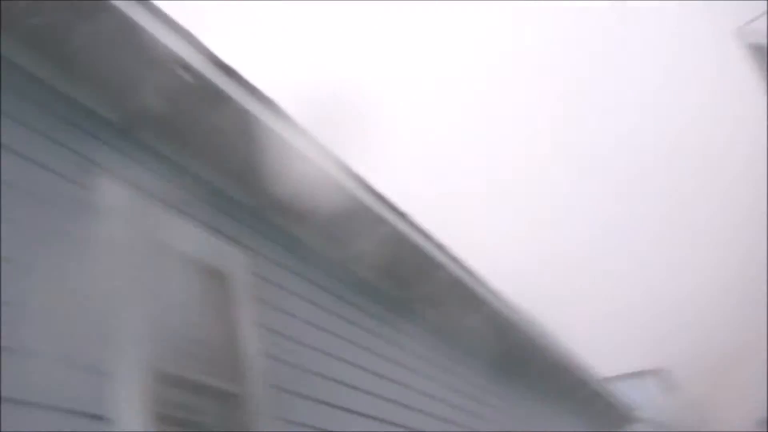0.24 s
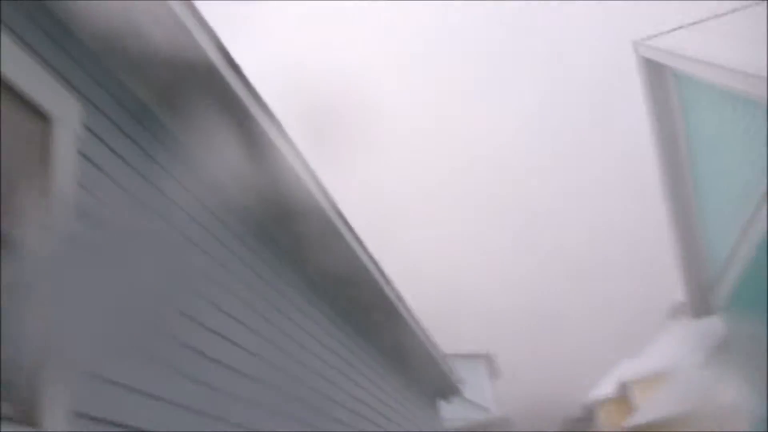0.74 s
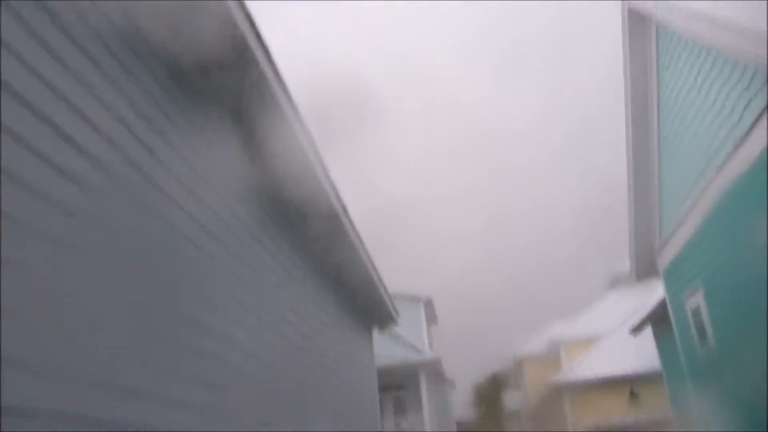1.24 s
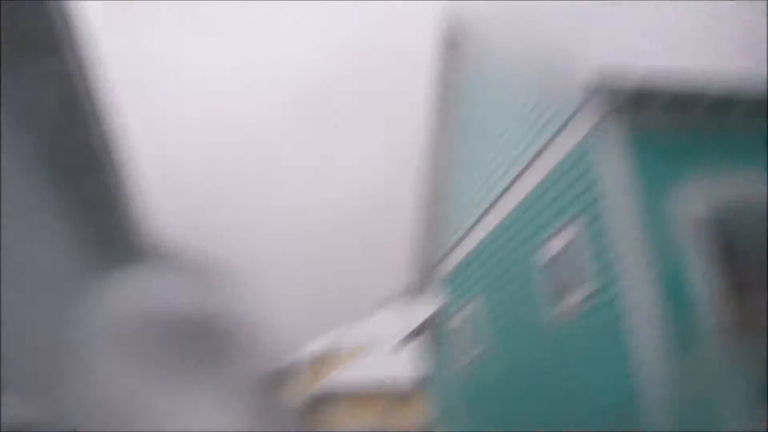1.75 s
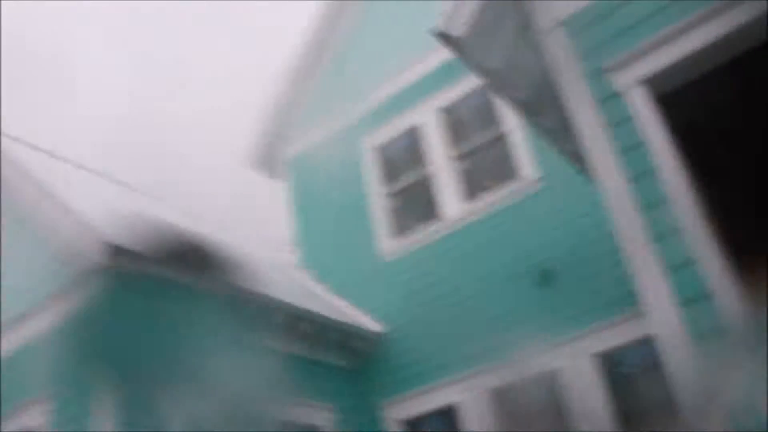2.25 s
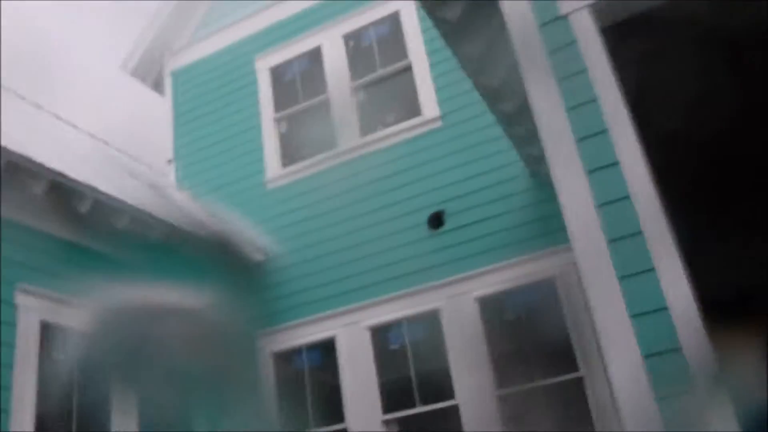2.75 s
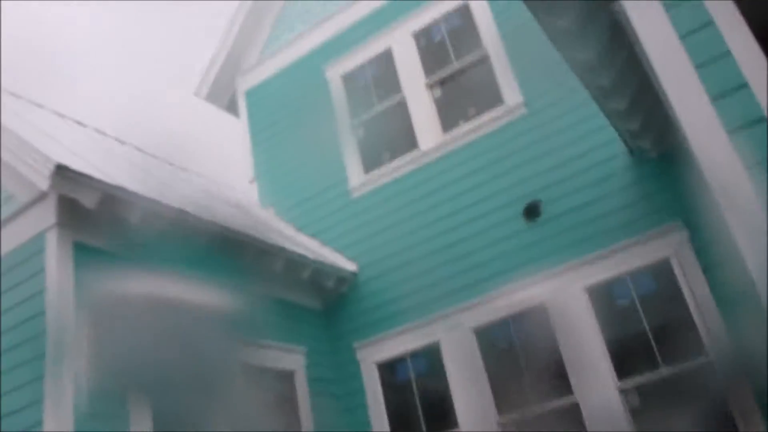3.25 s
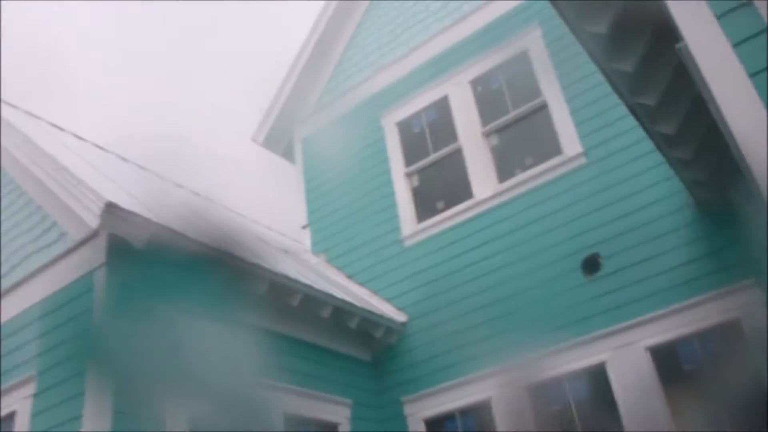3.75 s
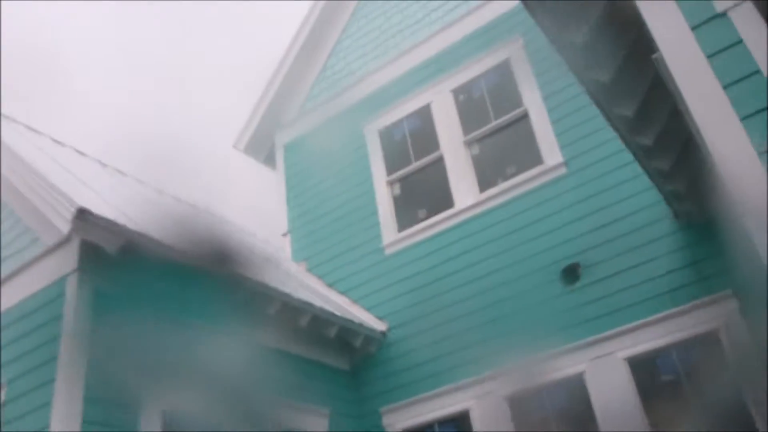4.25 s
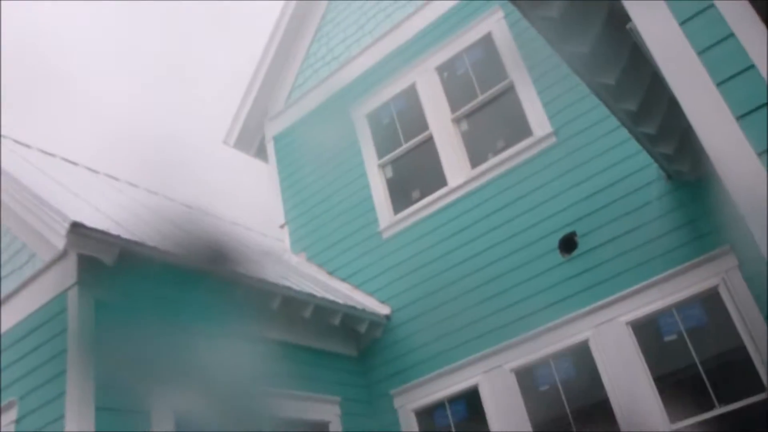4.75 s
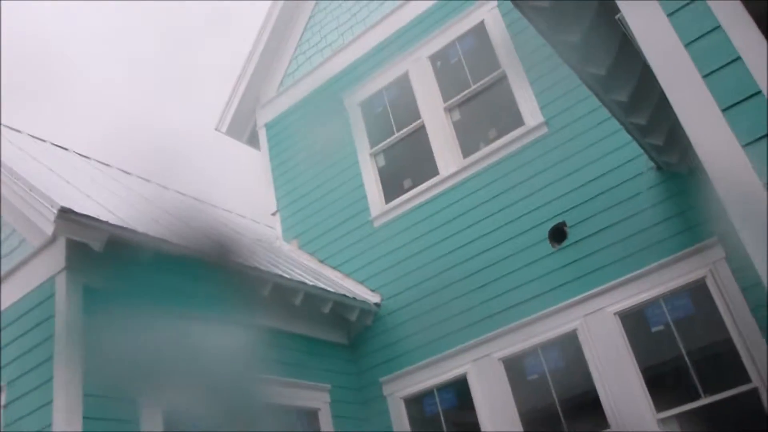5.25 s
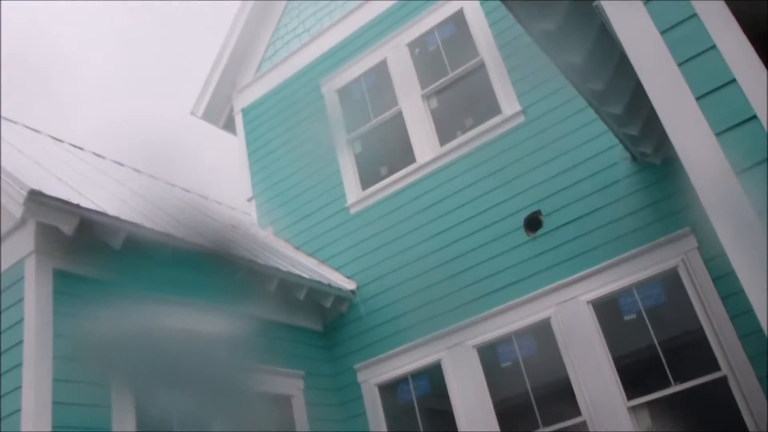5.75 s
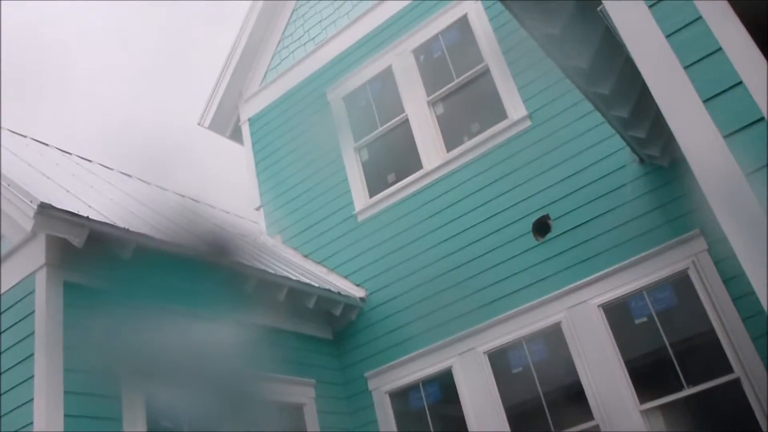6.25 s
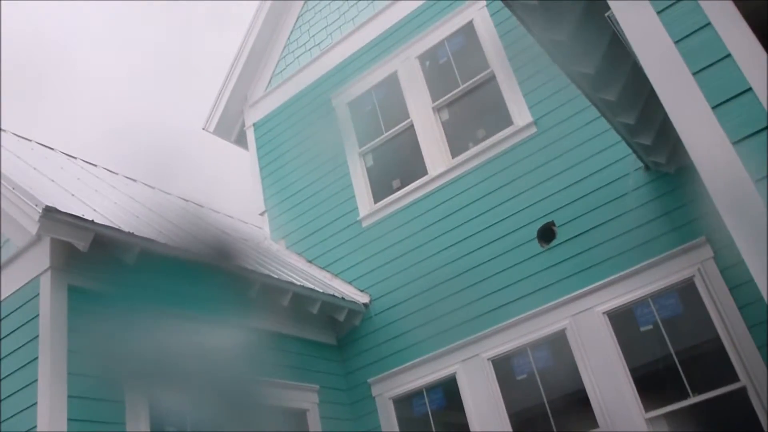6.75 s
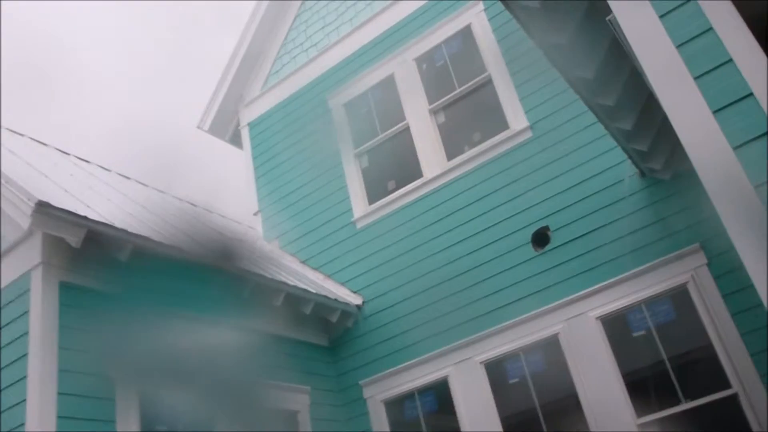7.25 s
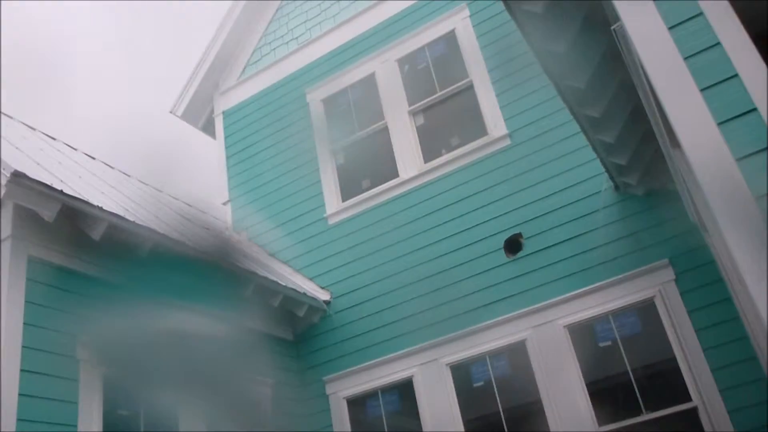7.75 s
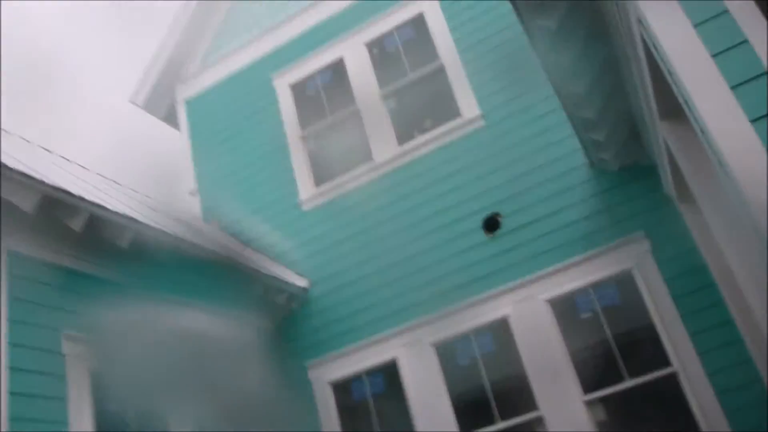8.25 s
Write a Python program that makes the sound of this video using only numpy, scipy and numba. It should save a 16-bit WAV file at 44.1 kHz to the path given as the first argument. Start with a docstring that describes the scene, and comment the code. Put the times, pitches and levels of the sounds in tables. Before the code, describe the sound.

A steady downpour outdoors, close and harsh, with bright pinging droplets, occasional low thuds on the casing and a few soft handling rubs.

```python
"""Heavy rain between wooden houses, heard through a small camera that stands out in it.
The downpour (coloured noise under flurries of tiny rings) swells within the first second, then comes in surges.
From the start drops ring the microphone port near 3.7 kHz, and soon fat ones thump the casing as damped pulses.
Soft low rubs of the hand, swelling bands of noise, come from about two seconds on and once more near the end.
Throughout, the hardest hits overload the input, and the gain control ducks the rain and lets it swell back."""
import sys
import numpy as np
from scipy import signal
from scipy.fft import rfft, irfft, next_fast_len
from scipy.io import wavfile
from scipy.ndimage import map_coordinates
from numba import njit

SR = 44100
rng = np.random.default_rng(int(sys.argv[2]) if len(sys.argv) > 2 else 0)


def generate_wav(signal):
    """Clip the signal to [-1, 1] and save it as 16-bit WAV at the path in sys.argv[1]."""
    frames = np.transpose(np.atleast_2d(signal))
    scaled = np.clip(frames, -1, 1) * 32767
    pcm = np.round(scaled).astype(np.int16)
    wavfile.write(sys.argv[1], SR, pcm)


N = 374409
USUAL_RAIN_DB = -29  # spray level of usual rain, the reference for wash, drop sizes and pitch


def amp(db):
    """The decibel law: level in dB to amplitude ratio."""
    return 10 ** (np.asarray(db) / 20)


def unit(x):
    """Normalisation by mean power: scale to rms 1."""
    return x / np.sqrt(np.mean(x ** 2) + 1e-20)


def curves(rows):
    """Linear interpolation: one value per sample for each column after the time."""
    s, *columns = np.transpose(rows)
    t = np.arange(N) / SR
    return [np.interp(t, s, column) for column in columns]


def wobble(rate):
    """Band-limited fluctuation: a smooth curve through random knots, rate knots a second."""
    knots = rng.standard_normal(int(N * rate / SR) + 4)
    return map_coordinates(knots, [np.arange(N) * rate / SR])


def filtered(x, response):
    """Linear filtering: the spectrum of x times a complex response of frequency."""
    m = next_fast_len(N + SR // 2)
    hz = np.fft.rfftfreq(m, 1 / SR)
    return irfft(rfft(x, m) * response(hz), m)[:N]


def noise(spectrum):
    """Spectral shaping: white noise takes a (Hz, dB) colour and is set to rms 1."""
    f, db = np.transpose(spectrum)
    colour = lambda hz: amp(np.interp(np.log(hz + 1), np.log(f), db))
    return unit(filtered(rng.standard_normal(N), colour))


def placed(times, sounds):
    """Superposition: sum one short sound per row, each starting at its time in seconds."""
    start = np.round(np.maximum(times, 0) * SR).astype(int)
    index = start[:, None] + np.arange(sounds.shape[1])
    return np.bincount(index.ravel(), sounds.ravel(), N)[:N]


def port_hz(level_db):
    """Mass loading: more spray thickens the water film on the port and lowers its pitch."""
    usual_hz, sag_hz_per_db = 3837, 20
    return usual_hz - sag_hz_per_db * (level_db - USUAL_RAIN_DB)


def port_rings(hz, splash_db, rise, decay, splash_decay, splash_top_hz, size=220):
    """Damped resonance: per drop, a few cycles of the port's air, peak 1, under a brief splash (times in s)."""
    t = np.arange(size) / SR
    life = decay * np.exp(0.28 * rng.standard_normal((len(hz), 1)))
    envelope = (1 - np.exp(-t / rise)) * np.exp(-t / life)
    ring = np.sin(2 * np.pi * hz[:, None] * t) * envelope
    burst = rng.standard_normal(ring.shape) * np.exp(-t / splash_decay)
    band = signal.butter(2, [1400, splash_top_hz], "band", fs=SR, output="sos")
    hiss = signal.sosfilt(band, burst)
    # each splash also has a short note of its own, from the spot it lands on
    spot_hz = 1300 * 5.4 ** rng.random((len(hz), 1))
    spot = np.sin(2 * np.pi * spot_hz * t) * envelope
    splash = 1.64 * hiss + 0.67 * spot
    return ring / np.abs(ring).max(axis=1, keepdims=True) + amp(splash_db)[:, None] * splash


def wash(level_db):
    """Incoherent summation: countless far drops merge into a hiss that follows the rain and wavers slightly."""
    # Wash of rain on roofs and ground, lifted around the port's resonance.
    # Each row: frequency in Hz, relative level in dB per Hz.
    wash_colour = [(20, -21), (65, 2), (130, 7), (280, 4.5), (600, 1), (1500, 0), (2700, -5), (3200, 1.5),
                   (4000, 15.5), (5300, -2), (7100, -1), (8300, -21), (10500, -12.5), (13000, -16),
                   (15500, -12)]
    usual_db, gain_per_spray_db = -33.5, 0.43
    wash_db = usual_db + gain_per_spray_db * (level_db - USUAL_RAIN_DB)
    return amp(wash_db + 0.7 * wobble(4.6)) * noise(wash_colour)


def handling():
    """Stick-slip friction: soft, lumpy low rubs as the camera is turned."""
    # The hand shifts on the casing.
    # Each row: time of the peak in seconds, peak rms in dB, half length (of a bell curve) in seconds.
    hand_shifts = [(1.924, -24, 0.0054), (1.96, -35, 0.081), (2.002, -28, 0.0053), (2.25, -44, 0.24),
                   (2.483, -28, 0.014), (2.757, -32.5, 0.031), (3.471, -34, .009), (8.127, -44, 0.046)]
    lump_db, lumps_per_s = 4, 60
    t = np.arange(N) / SR
    grip = sum(amp(db) * np.exp(-.5 * ((t - s) / length) ** 2) for s, db, length in hand_shifts)
    lumps = unit(amp(lump_db * wobble(lumps_per_s)))
    return grip * lumps * noise([(25, -38), (90, 3), (300, -6.0), (520, -25.0), (1500, -48), (8000, -88)])


def spray(level_db, count=7000):
    """Random arrivals in flurries: most droplets are tiny, and heavier spray brings more that tick."""
    flurry = np.cumsum(amp(3.5 * wobble(14)))
    at = np.minimum(np.searchsorted(flurry, rng.random(count) * flurry[-1]), N - 1)
    spread_db = np.clip(4.5 + 0.5 * (level_db[at] - USUAL_RAIN_DB), 3.5, 6)
    size_db = np.minimum(spread_db * rng.exponential(size=count), 24) - 1.7 * spread_db
    hz = port_hz(level_db[at]) * np.exp(0.052 * rng.standard_normal(count))
    splash_db = -18 + 6 * rng.standard_normal(count)
    rings = port_rings(hz, splash_db, rise=0.00044, decay=0.00059, splash_decay=0.00088, splash_top_hz=6300)
    return amp(level_db) * unit(placed(at / SR, amp(size_db)[:, None] * rings))


def patter(level_db, count=28):
    """Arrival rate follows rain strength: middling drops tick at uneven intervals, more often in heavier rain."""
    fallen = np.cumsum(amp(level_db))
    share = (np.arange(count) + rng.random(count)) / count  # one drop in each equal share of the rain
    at = np.minimum(np.searchsorted(fallen, share * fallen[-1]), N - 1)
    strength, pitch, splash = rng.standard_normal((count, 3)).T
    hz = port_hz(level_db[at]) * np.exp(.03 * pitch)
    ring_db = -8.5 + 1.5 * strength
    splash_db = -9 + 4.5 * splash  # against the ring
    rings = port_rings(hz, splash_db, rise=.00044, decay=0.00051, splash_decay=0.00048, splash_top_hz=6100)
    return placed(at / SR, amp(ring_db)[:, None] * rings)


def thumps(leak_hz, ring_db, size=2000):
    """Impulsive excitation of modes: a push and pull of pressure, a low casing thud and a faint port ring."""
    # Fat drops on the casing.
    # Each row: start in seconds, slap level in dB, slap's spectral peak in Hz, thud level in dB (before the leak).
    fat_drops = [(0.637, 8.5, 670, 11.5), (0.9723, 0, 252, -1.5), (1.8387, -3, 220, -5),
                 (2.749, 2, 1110, -31), (3.967, -16, 240, -16.5), (4.118, 0, 890, -20),
                 (4.1468, 23, 1250, -26), (4.5067, 1.5, 700, -19), (6.1559, -6.5, 153, 1.5),
                 (6.328, -6.5, 930, -14), (6.656, 0, 384, 1.5), (6.711, -11, 299, -4),
                 (7.003, 22.5, 413, 14), (7.3443, 22.5, 630, 4.5)]
    # The casing's low modes. Each row: frequency in Hz, relative level in dB, decay time constant in seconds.
    casing_modes = [(136, -0.5, 0.0051), (222, 0, 0.0032), (423, -6, 0.0013), (800, -9, 0.001)]
    s, slap_db, slap_hz, thud_db = np.transpose(fat_drops)[:, :, None]
    t = np.arange(size) / SR
    u = 2 * np.pi * np.sqrt(2) * slap_hz * t
    slap = 2.67 * u * (2 - u) * np.exp(-u)
    thud = sum(amp(db) * np.sin(2 * np.pi * hz * t) * np.exp(-t / decay) for hz, db, decay in casing_modes)
    ring = port_rings(np.full(len(s), 3700), np.full(len(s), -8), rise=.0004, decay=0.00066,
                      splash_decay=0.001, splash_top_hz=6340, size=size)
    blows = placed(s[:, 0], amp(slap_db) * (slap + amp(ring_db) * ring) - amp(thud_db) * thud)
    # the pressure leaks away through the port
    return filtered(blows, lambda hz: (1j * hz / (leak_hz + 1j * hz)) ** 2)


def drops():
    """Resonance under direct impact: sharp ticks, each at the pitch of the wet port."""
    # The clearest drops striking by the port.
    # Each row: start in seconds, ring peak in dB, ring frequency in Hz, splash level in dB against the ring.
    port_drops = [(.2622, -6, 4200, -6), (0.36, -1.5, 3900, -5), (0.4004, 2.5, 3780, -16),
                  (0.4774, -3, 3750, -6), (.4858, 1, 4370, -3.5), (0.5326, 13, 4060, -8),
                  (.6149, 8.5, 3650, -20), (.7627, 3.5, 3700, -22), (0.78, 5.5, 3720, -17),
                  (.7915, 27, 3894, -11.5), (.9435, 10.5, 3680, -30), (1.1361, 5.5, 3860, -13),
                  (1.1696, 22.5, 3590, -12), (1.183, 10, 3600, -23), (1.2065, 19, 3820, -24),
                  (1.4485, -3, 3530, -9), (1.5986, 7, 3460, -7.5), (1.63, -9, 3730, 3.5),
                  (1.672, -0.5, 3600, -17), (1.7515, 2.5, 3610, -36), (1.771, 1, 3400, -3),
                  (1.892, 3.5, 3730, -17), (1.9336, -4, 3970, -14), (2.002, 18, 3450, -8),
                  (2.0173, 6.5, 3540, -12), (2.0267, 4, 3460, -9), (2.0543, 2.5, 3670, -22),
                  (2.0816, 2, 3400, -25), (2.223, 4.5, 3680, -6), (2.291, 36, 3706, -19),
                  (2.3755, 4, 3460, -7), (2.575, 12, 4040, -28), (2.6018, 22.5, 3760, -5.5),
                  (2.7493, 4.5, 3560, 0), (2.855, 21, 3730, -10.5), (2.9613, -1, 3670, -15),
                  (3.0376, -1.5, 3500, -15), (3.0609, 17, 3520, -9.5), (3.3509, 10, 3740, -16),
                  (3.3996, 12, 3800, -38), (3.6942, 6, 3850, -19), (4.1018, -5, 3810, -10),
                  (4.1176, 6, 3660, 0), (4.6676, 3.5, 3800, -18), (4.7076, 3, 3600, -17),
                  (4.729, -1, 4000, -4), (4.7352, 3, 3930, -10.5), (4.9785, -6, 3540, -16),
                  (5.0642, 14, 3955, -4), (5.5957, 2, 3810, -23), (5.9824, -8, 3670, -2),
                  (6.1556, 15.5, 3570, -10), (6.2134, 7, 3540, -10), (6.2636, 3.5, 3830, -8),
                  (6.3286, 20, 3910, -6), (6.4571, 30.5, 3630, 3), (6.6238, 15.5, 3530, -7),
                  (6.667, 6.5, 3860, -17), (6.7107, 23, 3580, -5), (6.7389, 20, 3710, -19),
                  (6.922, 7, 3890, -12.5), (6.952, -5.5, 3780, -3), (7.0026, 25, 3510, -0.5),
                  (7.3236, 3.5, 3990, -16), (7.3566, 11.5, 3760, -10), (7.6395, -6.5, 3750, -3.5),
                  (7.8789, -.5, 3370, -11), (7.9361, -1, 3480, -6.5), (8.0323, -4.5, 3700, -4.5),
                  (8.096, -4.5, 3620, -8), (8.1511, -4, 3930, -5), (8.3528, 5, 3710, -24),
                  (8.3779, 17.5, 3520, -10)]
    s, db, hz, splash_db = np.transpose(port_drops)
    rings = port_rings(hz, splash_db, rise=0.00044, decay=0.00059, splash_decay=0.00051, splash_top_hz=5940)
    return placed(s, amp(db)[:, None] * rings)


def scene():
    """Superposition of sources: one rain strength drives wash, spray and patter; hits and rubs are added."""
    # Strength of the downpour, as the level of its spray on the camera.
    # Each row: time in seconds, level in dB.
    rain_strength = [(0, -36), (.12, -30), (.4, -32), (.7, -19), (1, -23), (1.4, -24), (1.8, -28),
                     (2.15, -22.5), (2.9, -26.5), (3.8, -29.5), (4.4, -26.5), (4.8, -30.5), (5.2, -29.5),
                     (6, -31.5), (6.4, -27.5), (7.2, -33), (7.6, -28.5), (8.45, -30)]
    rain_db, = curves(rain_strength)
    rain = wash(rain_db) + spray(rain_db) + patter(rain_db)
    hits = drops() + thumps(leak_hz=94, ring_db=-18)
    return (rain + hits + handling())[None]


@njit
def gain_control(x, ceiling, step, hold, release):
    """Feedback limiting: each overloaded sample steps the gain down; after a hold it creeps back to 1."""
    out = np.empty_like(x)
    gain, since = 1.0, 0  # since, hold and release count samples
    for i in range(len(x)):
        out[i] = x[i] * gain
        since += 1
        if abs(out[i]) > ceiling:
            gain *= step
            since = 0
        elif since > hold:
            gain += (1 - gain) / release
    return out


def record(dry):
    """Nonlinear then linear transfer: gain control, saturation by what it catches too late, camera response."""
    # Narrow dips in the camera's response. Each row: centre in Hz, width in Hz.
    response_dips = [(2890, 190), (7850, 190), (11720, 790)]
    hold_s, release_s = .035, .5
    soft_hz, top_hz = 11700, 15900  # gentle treble loss, then the steep band limit
    ducked = gain_control(dry[0], 0.98, amp(-.29), hold_s * SR, release_s * SR)
    clipped = ducked / (1 + np.abs(ducked / .95) ** 6) ** (1 / 6)

    def notches(hz):
        """Anti-resonance: each dip cancels its centre frequency."""
        return np.prod([(c * c - hz * hz) / (c * c - hz * hz + 1j * hz * w) for c, w in response_dips], axis=0)

    coloured = filtered(clipped, lambda hz: notches(hz) / np.hypot(1, (hz / soft_hz) ** 4))
    return filtered(coloured, lambda hz: 1 / (1 + (hz / top_hz) ** 120))[None]


dry = scene()
out = record(dry)
generate_wav(out)
```